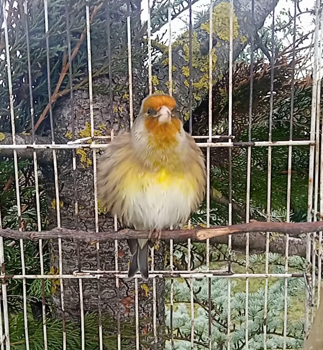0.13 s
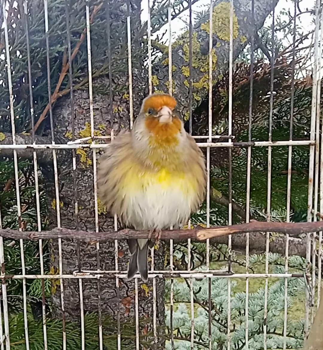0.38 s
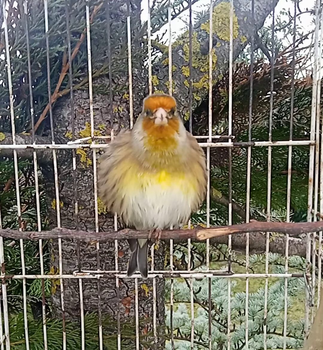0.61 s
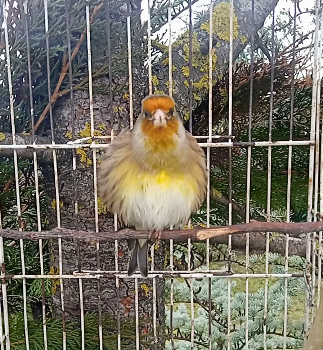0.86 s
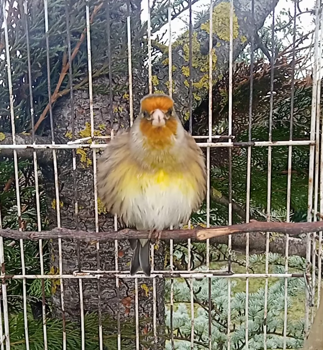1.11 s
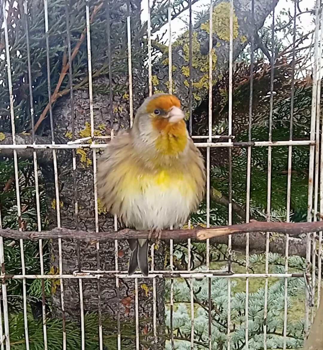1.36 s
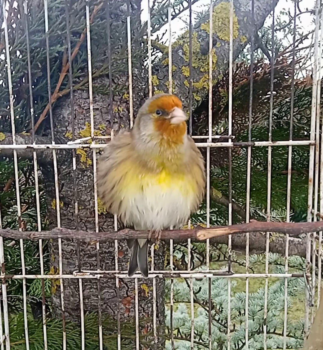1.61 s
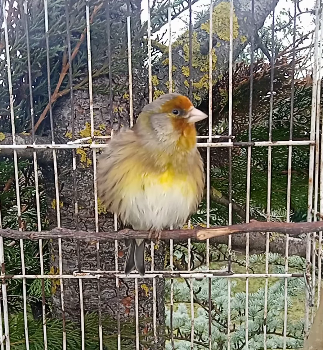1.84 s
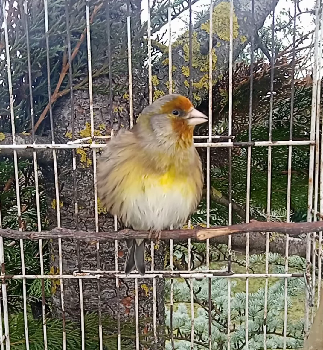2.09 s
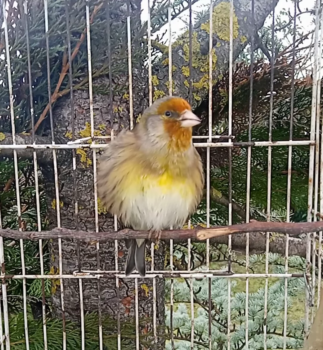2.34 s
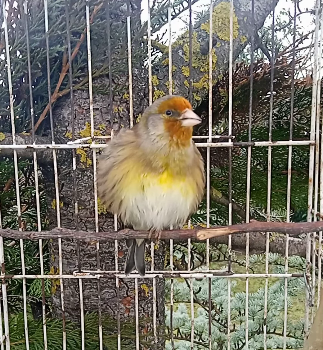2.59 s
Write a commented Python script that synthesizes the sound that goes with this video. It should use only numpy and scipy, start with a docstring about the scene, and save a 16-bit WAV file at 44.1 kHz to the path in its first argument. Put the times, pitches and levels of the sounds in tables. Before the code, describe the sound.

A small caged finch close by sings rapid high twitters, creaky whistles and buzzy trills outdoors, over faint distant traffic wash and light garden echoes.

```python
"""Birdsong in a garden, over a low wash of distant traffic that lasts throughout.
From the start a finch sings quick slurs close by, with faint echoes from walls and trees; a far dove coos.
Whistles, some creaky, come next, then buzzes; a rustle passes at about 1.5 s, ripples and trills follow.
A second coo comes near the end. The song is one or two syrinx tones with overtones in a shared air stream;
wash and rustle are shaped noise, the echoes a decaying noise response, the coos wavering sines."""
import sys
import numpy as np
from scipy import signal
from scipy.fft import rfft, irfft
from scipy.io import wavfile
from scipy.ndimage import uniform_filter1d

SR = 44100
rng = np.random.default_rng(int(sys.argv[2]) if len(sys.argv) > 2 else 0)


def gain_from_decibels(decibels):
    """Convert decibel values to linear amplitude factors."""
    exponent = np.asarray(decibels, float) / 20
    return 10 ** exponent


def waveform_to_disk(signal):
    """Save audio, clipped to [-1, 1], as 16-bit WAV at the path in sys.argv[1]."""
    frames = np.transpose(np.atleast_2d(signal))
    scaled = np.clip(frames, -1, 1) * 32767
    samples = np.round(scaled).astype(np.int16)
    wavfile.write(sys.argv[1], SR, samples)


N = 358974

# Song levels in these tables are nominal, ahead of level chance and the bird's colouring.
# Returning phrases. Each row: start from phrase start in seconds, length in seconds, start, middle and
# end pitch in Hz, level in dB, peak lateness if unusual (below 1 early, above 1 late).
TRILL_NOTES = [(0, .012, 8855, 7050, 6400, -26, .62), (.002, .026, 4350, 3800, 3450, -40),
               (.02, .029, 5606, 5353, 5364, -21.5), (.05, 0.008, 5180, 3400, 2626, -27),
               (.056, 0.022, 2700, 1900, 1300, -25)]
SKIP_NOTES = [(0, .013, 7630, 6030, 8000, -23.5), (.047, 0.047, 7300, 6506, 6210, -14.5, 1.15),
              (.128, .013, 1300, 1800, 2500, -28.5), (.137, 0.04, 2450, 1750, 1230, -25, .5)]
ZIP_NOTES = [(0, .01, 1205, 1695, 2413, -34), (.007, .014, 2704, 6530, 8660, -22.5)]
SWOOP_NOTES = [(-.002, 0.01, 2955, 5200, 4630, -22), (.012, 0.021, 4700, 4880, 4310, -27),
               (.033, 0.022, 3110, 1910, 2140, -28.5), (.056, .031, 2430, 3550, 3430, -35.5),
               (.096, 0.061, 3270, 2330, 2100, -25)]
PIP_NOTES = [(-0.0063, 0.035, 6450, 6675, 7200, -12.5)]
CHEEP_NOTES = [(-.004, .03, 3176, 3625, 3704, -20.5), (.006, 0.005, 1386, 1720, 1890, -47.5),
               (.097, .03, 2350, 3050, 3150, -26)]
# When phrases are sung. Each row: start in seconds, gain in dB, stretch of times and lengths if any (ratio).
TRILL_TIMES = [(3.549, -2.5, 0.85), (3.655, 0), (3.763, 0), (3.874, 0), (3.985, 0), (4.095, 0)]
SKIP_TIMES = [(0.502, -2), (0.729, 0.53)]
ZIP_TIMES = [(1.957, 0.5), (2.632, -0.5, 0.87), (2.821, -2, 0.69), (2.833, -3, 0.85), (6.76, 1, .95),
             (7.026, 3.5, 1.16)]
SWOOP_TIMES = [(.009, -10, .93), (5.787, 0)]
PIP_TIMES = [(2.666, -1.2), (2.856, -0.15), (6.793, 1.9)]
CHEEP_TIMES = [(4.976, -0.51, 0.93), (5.234, 0.27, 1.06)]
# Runs of rising strokes. Each row: start in seconds, gain in dB, number of strokes, stretch (ratio).
RIPPLE_TIMES = [(2.528, 0, 4, 1), (2.716, 1, 4, 1), (6.649, 1, 4, .92), (6.855, 1, 3, 1.25)]
# Long whistles, one curve each. Each row: time in seconds, pitch in Hz, level in dB.
WHISTLE_CURVES = [
    [(2.086, 8550, -37.5), (2.108, 6520, -28.5), (2.15, 5963, -24), (2.26, 5694, -17), (2.362, 5750, -34.5)],
    [(2.1, 5580, -49), (2.13, 4750, -41), (2.2, 3973, -31.5), (2.35, 3833, -45)],
    [(5.63, 1327, -32), (5.69, 1390, -33.5), (5.73, 1568, -31), (5.775, 1936, -33.5)],
    [(5.63, 1768, -43), (5.69, 1780, -38), (5.73, 1943, -30.5), (5.77, 2153, -37.5)],
    [(6.416, 2075, -37.5), (6.43, 2857, -32.5), (6.46, 3200, -19), (6.483, 3665, -25.5)],
    [(7.153, 6000, -34.5), (7.166, 5100, -30.5), (7.18, 4410, -26), (7.205, 3770, -15),
     (7.222, 3388, -27.5)],
]
# Whistle with a creaky start, every second vibration weaker.
# Each row: time from its start in seconds, pitch in Hz, level in dB, creak 0-1.
CREAKY_CURVE = [(0.0, 1270, -43, 0.8), (0.015, 1900, -33, 0.7), (0.042, 3120, -31.5, 0.65),
                (0.054, 4100, -32.5, 0.1), (0.062, 4490, -15.5, 0.12), (0.085, 4500, -21, 0.02),
                (0.125, 4570, -23.5, 0.02), (0.16, 4450, -41.5, 0.1)]
# Creaky whistles. Each row: start in seconds, gain in dB.
CREAKY_TIMES = [(0.243, -3.5), (6.02, 2)]
# Buzzes, one curve each. Each row: time in seconds, centre pitch in Hz, level in dB.
BUZZ_CURVES = [
    [(1.156, 5070, -42), (1.2, 4620, -24), (1.228, 4400, -25)],
    [(1.248, 2780, -29), (1.29, 2550, -32.5), (1.39, 2230, -33), (1.415, 1950, -45)],
    [(4.212, 8900, -44.5), (4.24, 7400, -23), (4.272, 6640, -18), (4.3, 4480, -29)],
    [(4.3, 4400, -26), (4.35, 3760, -22.5), (4.42, 3637, -30), (4.49, 3185, -38.5)],
    [(4.32, 1980, -45), (4.455, 1800, -41), (4.49, 2100, -43)],
    [(7.222, 3310, -28), (7.3, 2820, -31.5), (7.35, 2655, -28), (7.475, 2524, -36.5)],
    [(7.935, 7480, -30), (7.96, 6490, -22), (7.979, 5890, -13)],
    [(8.015, 3400, -31), (8.04, 2773, -28.5), (8.072, 2260, -46)],
]
# Flutter of each buzz. Each row: nominal rate at start and at end in Hz, pitch swing in +-Hz, level swing 0-1.
BUZZ_FLUTTER = [(250, 205, 560, 0.5), (189.4, 86, 420, 0.3), (190, 105, 540, 0.4), (130.6, 70, 200, 0.6),
                (88, 78, 700, 0.95), (139.7, 160, 130, 0.5), (212, 170, 640, 0.7), (235, 158, 380, 0.7)]
# Fall from each overtone to the next: low notes pulsed, high ones pure. Each row: sung pitch in Hz, step in dB.
OVERTONE_STEP = [(1800, -7), (2600, -27), (4500, -28), (7500, -25)]
# Windpipe, beak and microphone together. Each row: frequency in Hz, gain in dB.
BIRD_COLOUR = [(900, -33), (1300, -6.5), (1900, 0), (2300, -10), (2800, -2.5), (3400, -11.5), (3700, -2),
               (4050, -6.5), (4500, 0.5), (6100, -8.5), (6700, 2), (8200, -7.5), (9500, -19.5),
               (13000, -6.5), (15500, -3.5)]
# Spectrum shape of the wash. Each row: frequency in Hz, relative density in dB per Hz.
WASH_SHAPE = [(35, -37.5), (55, -24), (70, 2), (160, -5), (700, -12.5), (3500, -11), (6000, -28.5),
              (16000, -30)]
# Dove coos. Each row: start in seconds, length in seconds, mean pitch in Hz, peak level in dB.
DOVE_COOS = [(.05, 0.33, 523, -71.5), (7.443, 0.83, 541, -72)]
# Rustle, a single row: middle in seconds, spread in seconds, centre in Hz, half width in Hz.
RUSTLE_SHAPE = (1.45, .13, 1000, 430)
# Slides (even), hooks (snap to a pitch and hold) and flicks (hold, leave late). Each row: start in seconds,
# length in seconds, start and end pitch in Hz, level in dB, peak lateness if unusual.
SLIDE_NOTES = [(7.655, 0.045, 3660, 4250, -20.5), (.959, .01, 8910, 6390, -30.5),
               (.983, .012, 5610, 5536, -20), (1.227, .019, 2563, 3910, -24.5),
               (1.592, 0.048, 1940, 3310, -41), (1.812, .03, 2345, 3820, -27),
               (1.911, 0.017, 2300, 2670, -31.5), (2.933, .036, 2640, 3267, -24.5),
               (2.965, 0.065, 3257, 4460, -17), (3.205, .023, 2370, 2740, -23.5),
               (3.401, 0.085, 2100, 3820, -27.5), (4.717, 0.025, 5547, 5590, -24),
               (5.554, 0.0086, 5860, 6970, -30), (4.717, 0.03, 6490, 6420, -14),
               (6.234, .025, 2318, 2856, -23.5), (6.315, 0.055, 4265, 5294, -17),
               (6.315, 0.016, 5230, 5750, -33.5), (3.307, .029, 3110, 4380, -21.5),
               (6.506, 0.018, 3100, 5500, -20.5), (6.596, .026, 6266, 5940, -29),
               (7.602, .03, 2260, 3180, -29), (7.74, .019, 2830, 4400, -23), (7.51, .016, 3520, 5600, -29),
               (7.511, .014, 4594, 6450, -24.5), (7.522, .038, 6560, 6080, -14),
               (7.916, .022, 8370, 7536, -21.5)]
HOOK_NOTES = [(.998, 0.02, 6240, 4450, -24), (7.056, 0.035, 7980, 7310, -14.5),
              (1.046, 0.025, 3030, 2780, -33), (1.436, 0.017, 3650, 5640, -28.5),
              (1.441, .051, 4476, 5057, -21.5), (1.984, .042, 8520, 7720, -18.5),
              (2.069, 0.0086, 4940, 8210, -21), (2.452, .033, 7750, 6065, -23.5),
              (2.462, .029, 5400, 4923, -26), (8.104, 0.0048, 7720, 5970, -27),
              (3.119, 0.028, 7380, 5644, -24), (3.123, .036, 5000, 4650, -24),
              (6.506, 0.023, 5665, 6090, -9.5), (6.595, .024, 7970, 7220, -18),
              (6.977, .028, 1600, 2560, -25.5), (7.148, .007, 8310, 6320, -17.5),
              (7.783, .042, 7380, 6187, -21.5), (7.781, .056, 6250, 4920, -30),
              (7.979, .021, 5840, 4690, -13), (7.999, 0.015, 3090, 3660, -21.5),
              (8.112, 0.006, 7330, 6550, -23)]
FLICK_NOTES = [(1.686, .05, 4643, 5200, -23.5), (4.805, .04, 2600, 3720, -35.5),
               (5.42, .045, 4203, 6330, -34.5), (5.421, 0.049, 5040, 7930, -18.5),
               (5.561, 0.0095, 7210, 5390, -33.5), (7.895, .02, 6760, 8490, -18, .5)]
# Arches, at top pitch half way and again at the end.
# Each row: start in seconds, length in seconds, start and top pitch in Hz, level in dB.
ARCH_NOTES = [(1.677, .03, 4314, 5667, -30), (1.839, 0.015, 2510, 3380, -28),
              (7.524, .032, 5544, 5380, -24.5), (8.113, .024, 5320, 6950, -24)]

# Share of the whole slide done by half length
EVEN_SHARE, EARLY_SHARE, LATE_SHARE, STROKE_SHARE = 0.67, 1.05, 0.19, 0.76
RISE_LATE, FALL_LATE = 1.136, 0.78  # rising notes peak late, falling ones early
LOUD_DB, POINT_PER_DB = -20, 0.28  # above LOUD_DB the breath arch grows more pointed
BUZZ_OVERTONE_MAX_DB, PLAIN_OVERTONE_MAX_DB = -29, -3  # limits on the overtone step
ECHO_DB, WASH_DB, RUSTLE_DB = -24.5, -73, -61.5


def evened(x):
    """Scales to unit rms."""
    return x / np.sqrt(np.mean(x ** 2) + 1e-20)


def read(points, hz):
    """Interpolates a (Hz, value) table over log frequency."""
    f, value = np.transpose(points)
    return np.interp(np.log(hz + 1), np.log(f + 1), value)


def add(mix, start_s, sound):
    """Adds a sound in place, cut at the end of the mix."""
    part = mix[round(start_s * SR):][:len(sound)]
    part += sound[:len(part)]


def wobble(count, span):
    """Slow chance of unit rms: noise averaged twice over span samples."""
    once = uniform_filter1d(rng.standard_normal(count), span)
    return evened(uniform_filter1d(once, span))


def wash():
    """Distant traffic and leaves: spectrally shaped noise whose level varies in slow patches."""
    frames = N // 256 + 5
    hz = np.fft.rfftfreq(1024, 1 / SR)[:, None]
    real, imaginary, patches = rng.standard_normal((frames, 513, 3)).T
    patches = uniform_filter1d(patches, size=10, axis=0)
    patches = evened(uniform_filter1d(patches, size=16, axis=1))
    spectrum = (real + 1j * imaginary) * gain_from_decibels(read(WASH_SHAPE, hz) + 2.3 * patches)
    far = signal.istft(spectrum, nperseg=1024, noverlap=768)[1][:N]
    return gain_from_decibels(WASH_DB) * evened(far)


def finch():
    """All notes share one air stream, then pass the windpipe, beak and microphone response."""
    air = air_stream(single_notes() + phrases() + long_tones())
    taps = irfft(gain_from_decibels(read(BIRD_COLOUR, np.fft.rfftfreq(512, 1 / SR))))
    return signal.oaconvolve(air, np.roll(taps, 256) * np.hanning(512), "same")


def air_stream(sung):
    """Shared air mixes overlapping voices into sum and difference tones; breath hisses past the membranes."""
    air, alone = np.zeros((2, N))
    for start_s, sound in sung:
        add(air, start_s, sound)
        add(alone, start_s, sound ** 2)
    size = np.sqrt(abs(uniform_filter1d(air ** 2, size=200))) + 1e-5
    breath = gain_from_decibels(-44) * size * rng.standard_normal(N)
    product = (air ** 2 - alone) / size  # only where voices overlap
    return air + 0.16 * product + 0.12 * product * air / size + breath


def phrases():
    """Returning groups of slurs, shifted, scaled and stretched, plus the ripples."""
    sung = []
    for phrase, plays in ((TRILL_NOTES, TRILL_TIMES), (ZIP_NOTES, ZIP_TIMES), (SWOOP_NOTES, SWOOP_TIMES),
                          (SKIP_NOTES, SKIP_TIMES), (PIP_NOTES, PIP_TIMES), (CHEEP_NOTES, CHEEP_TIMES)):
        for phrase_s, gain_db, *stretch in plays:
            stretch = stretch[0] if stretch else 1
            for s, length_s, start_hz, middle_hz, end_hz, db, *late in phrase:
                sound = note(length_s * stretch, start_hz, middle_hz, end_hz, db + gain_db, *late)
                sung.append((phrase_s + s * stretch, sound))
    for row in RIPPLE_TIMES:
        sung.extend(ripple(*row))
    return sung


def note(length_s, start_hz, middle_hz, end_hz, db, late=None, point=0.94, creak=0.):
    """A slur through three pitches under one arch of breath."""
    late = late or (RISE_LATE if middle_hz > start_hz else FALL_LATE)
    u = np.linspace(0, 1, round(length_s * SR + 60))  # 60 samples over the nominal length
    hz = start_hz * (1 - u) * (1 - 2 * u) + middle_hz * 4 * u * (1 - u) + end_hz * u * (2 * u - 1)
    point = point + POINT_PER_DB * max(db - LOUD_DB, 0)
    breath = abs(np.sin(np.pi * u ** late)) ** point
    return voice(hz, gain_from_decibels(db) * breath, creak)


def voice(hz, level, creak=0., shake_hz=0., overtone_max_db=PLAIN_OVERTONE_MAX_DB):
    """One half of the syrinx: a tone with falling overtones, plus half-pitch lines when creaky."""
    slide = np.minimum(abs(np.gradient(np.log(hz))) * SR, 60)
    drop = slide * (np.gradient(hz) < 0)
    # fast slides shake the membranes; low notes rasp too
    rasp = .0015 + .0013 * slide + .14 * gain_from_decibels(2 * read(OVERTONE_STEP, hz))
    hz = hz * (1 + rasp * wobble(len(hz), span=16))
    hz = abs(hz + shake_hz)
    half = np.exp(1j * np.pi * np.cumsum(hz) / SR)  # turns at half the sung pitch
    step = gain_from_decibels(np.minimum(read(OVERTONE_STEP, hz), overtone_max_db))
    stack = half ** 2 / (1 - 1j * step * half ** 2)
    between = creak ** 2 * (half + half ** 3 / (1 - 0.78 * half))
    level = level * (1 + .009 * drop * (hz < 4200) * wobble(len(hz), span=7))  # low falls rattle
    level = level * gain_from_decibels(1.2 * wobble(len(hz), span=120))
    return level * (stack + between).real


def garden(x):
    """Scattered echoes from walls and trees: noise with a fast and a half-second decay."""
    t = np.arange(SR) / SR
    late = gain_from_decibels(-60 * t / 0.52)
    early = 4. * gain_from_decibels(-60 * t / .12)
    tail = rng.standard_normal(SR) * (late + early) * (t > .004)
    tail = signal.lfilter([1], [1, -.58], tail)  # leaves and air eat the treble
    return signal.fftconvolve(x, tail / np.linalg.norm(tail))[:N]


def dove():
    """Far coos: sines of wavering pitch, each under a smooth swell."""
    out = np.zeros(N)
    for start_s, length_s, hz, db in DOVE_COOS:
        count = round(length_s * SR)
        turns = np.cumsum(hz * (1 + 0.016 * wobble(count, span=1500))) / SR
        add(out, start_s, gain_from_decibels(db) * np.sqrt(np.hanning(count)) * np.sin(2 * np.pi * turns))
    return out


def long_tones():
    """Creaky whistles, plain whistles and buzzes."""
    sung = [(start_s, gain_from_decibels(gain_db) * whistle(CREAKY_CURVE)[1]) for start_s, gain_db in CREAKY_TIMES]
    sung += [whistle(rows) for rows in WHISTLE_CURVES]
    sung += [whistle(rows, flutter) for rows, flutter in zip(BUZZ_CURVES, BUZZ_FLUTTER)]
    return sung


def whistle(rows, flutter=(0, 0, 0, 0)):
    """A long tone along its curve; a flutter shakes pitch and level together and makes it buzz."""
    s, hz, db, *creak = np.transpose(rows)
    t = np.arange(s[0], s[-1] + .003, 1 / SR)
    first_hz, last_hz, swing_hz, depth = flutter
    rate_hz = np.linspace(first_hz, last_hz, len(t)) * (1 + .2 * wobble(len(t), span=350))
    turns = np.cumsum(rate_hz) / SR
    shake = np.sin(2 * np.pi * turns - 1)
    level = gain_from_decibels(np.interp(t, s, db)) * (1 + np.clip(depth, 0, 1) * np.cos(2 * np.pi * turns + 2.2))
    level *= gain_from_decibels(3.5 * depth * wobble(len(t), span=250))  # uneven flutters
    level *= np.clip(np.minimum(t - t[0], t[-1] - t) / 0.0014, 0, 1)  # 1.4 ms fades
    creak = np.clip(np.interp(t, s, creak[0]), 0, 1) if creak else 0.
    overtone_max_db = BUZZ_OVERTONE_MAX_DB if first_hz else PLAIN_OVERTONE_MAX_DB
    return s[0], voice(np.interp(t, s, hz), level, creak, swing_hz * shake, overtone_max_db)


def single_notes():
    """Slides, hooks, flicks and arches: slurs that differ in the pitch reached half way."""
    sung = []
    for rows, share in ((SLIDE_NOTES, EVEN_SHARE), (HOOK_NOTES, EARLY_SHARE), (FLICK_NOTES, LATE_SHARE)):
        for s, length_s, start_hz, end_hz, db, *late in rows:
            middle_hz = start_hz + share * (end_hz - start_hz)
            sung.append((s, note(length_s, start_hz, middle_hz, end_hz, db, *late)))
    for s, length_s, start_hz, top_hz, db in ARCH_NOTES:
        sung.append((s, note(length_s, start_hz, top_hz, top_hz, db)))
    return sung


def rustle():
    """One passing rustle: band noise under a bell-shaped swell."""
    middle_s, spread_s, centre_hz, width_hz = RUSTLE_SHAPE
    hz = np.fft.rfftfreq(N, 1 / SR)
    band = irfft(rfft(rng.standard_normal(N)) / (1 + ((hz - centre_hz) / width_hz) ** 4), N)
    swell = np.exp(-((np.arange(N) / SR - middle_s) / spread_s) ** 2)
    return gain_from_decibels(RUSTLE_DB) * evened(band) * swell


def ripple(start_s, gain_db, strokes, stretch):
    """Rising strokes in quick succession, each reaching higher, with chance in start pitch and level."""
    for k in range(int(strokes)):
        top_hz = 4600 + 70 * (k + 4 - strokes) ** 2
        low_hz = 2300 * (1 + .2 * (2 * rng.random() - 1))
        middle_hz = low_hz + STROKE_SHARE * (top_hz - low_hz)
        db = -19.5 + gain_db + 3 * (2 * rng.random() - 1)
        stroke = note(.026 * stretch, low_hz, middle_hz, top_hz, db, late=1.4, point=1.9, creak=.13)
        yield start_s + k * .0187 * stretch, stroke


def scene():
    """Bird, its echoes and the background."""
    bird = finch()
    return (bird + gain_from_decibels(ECHO_DB) * garden(bird) + wash() + rustle() + dove())[None]


def roll_off(x):
    """The treble ends steeply here."""
    return signal.sosfilt(signal.butter(12, 16300, fs=SR, output="sos"), x)


def record(dry):
    """Delivers the finished mix."""
    return roll_off(dry)


dry = scene()
out = record(dry)
waveform_to_disk(out)
```